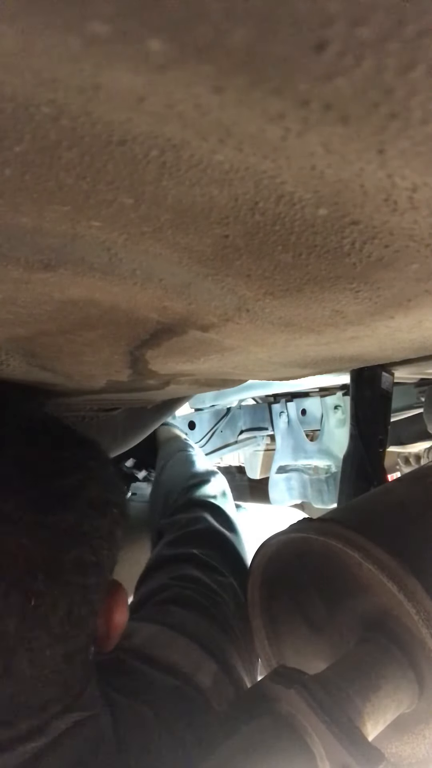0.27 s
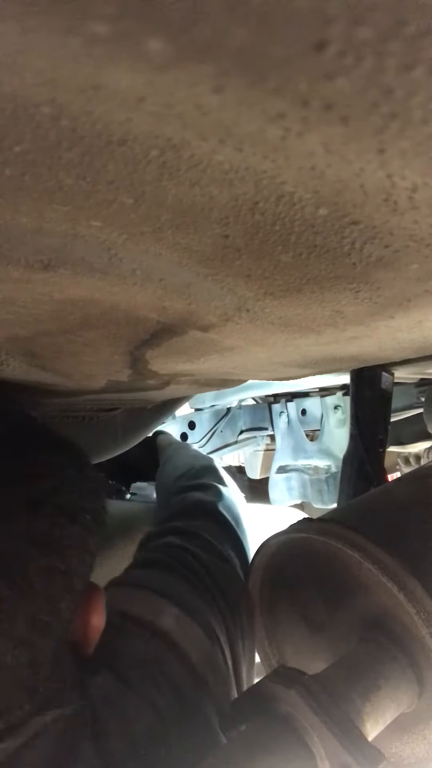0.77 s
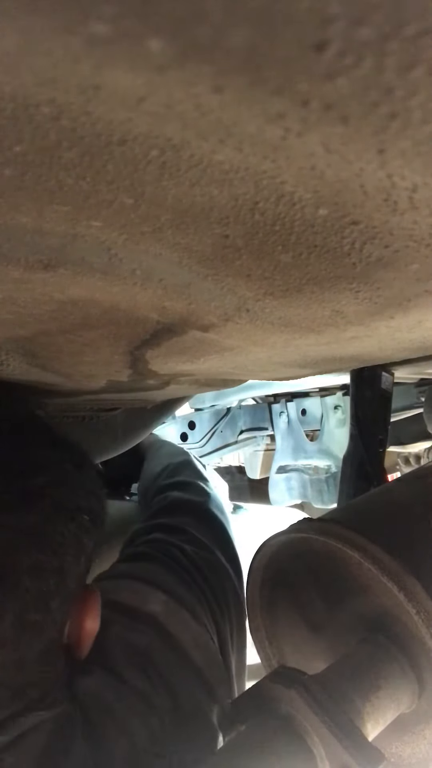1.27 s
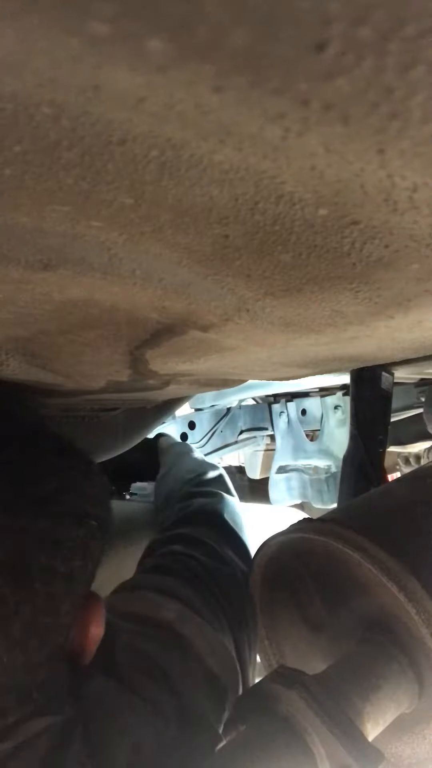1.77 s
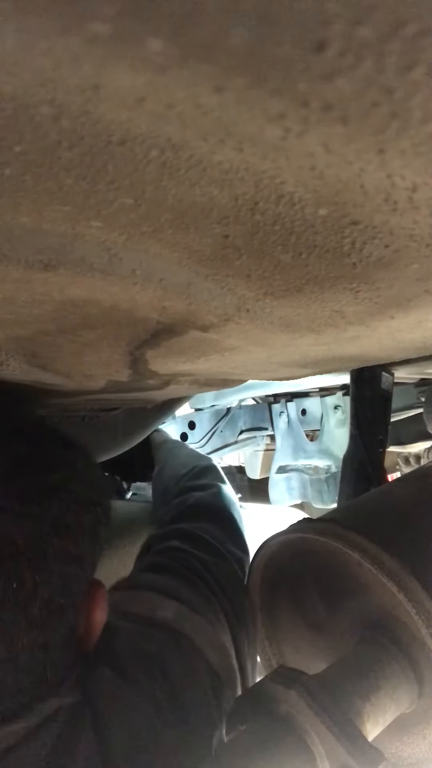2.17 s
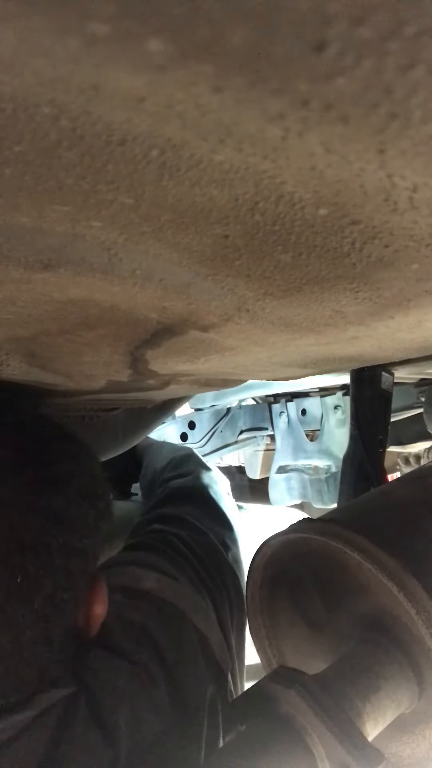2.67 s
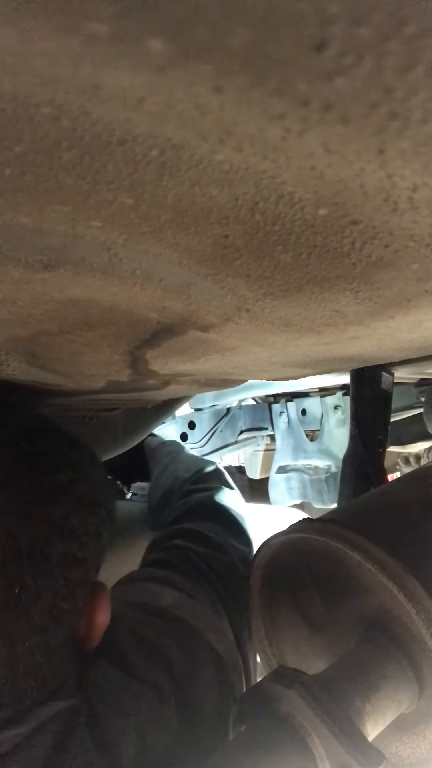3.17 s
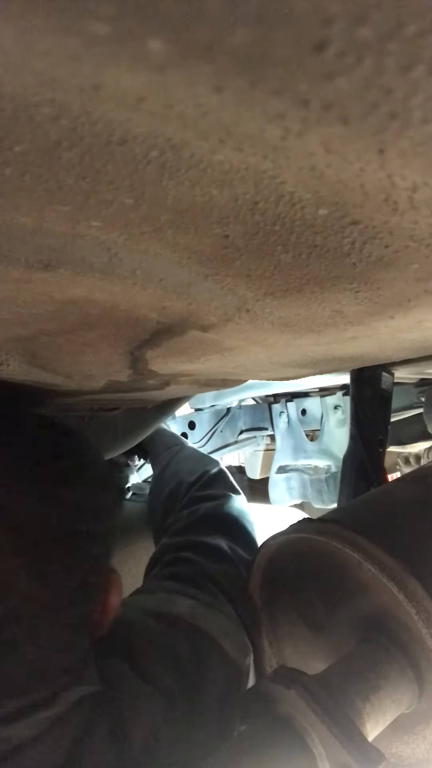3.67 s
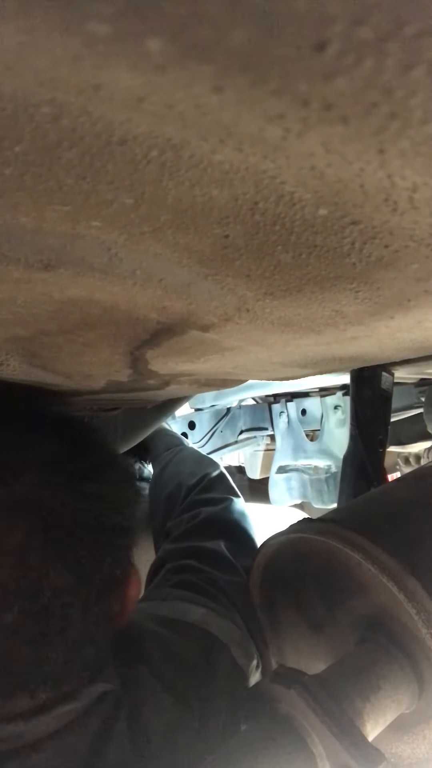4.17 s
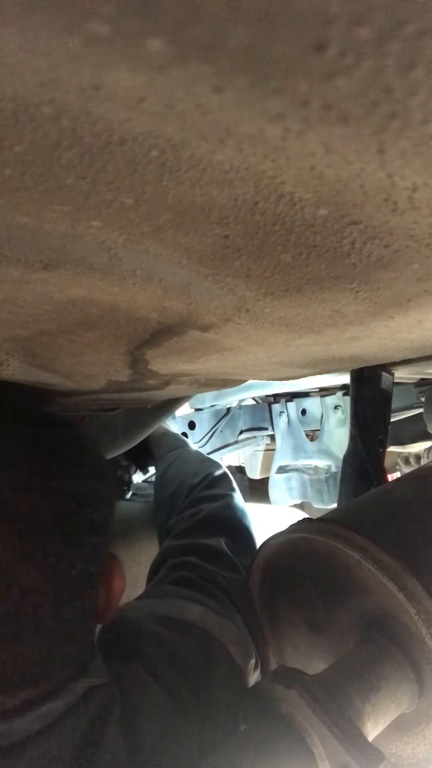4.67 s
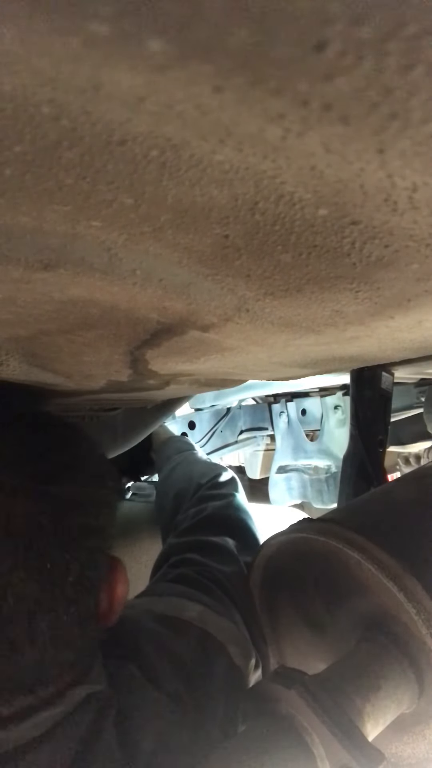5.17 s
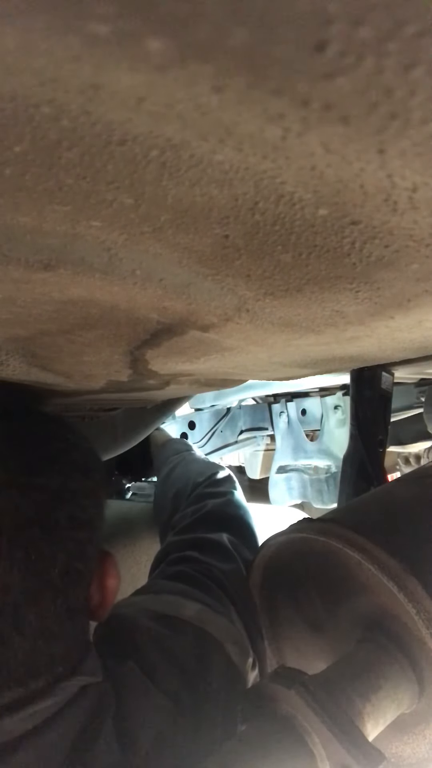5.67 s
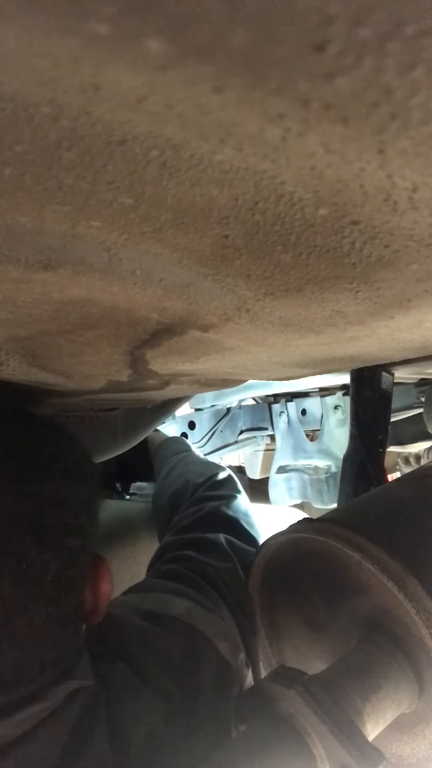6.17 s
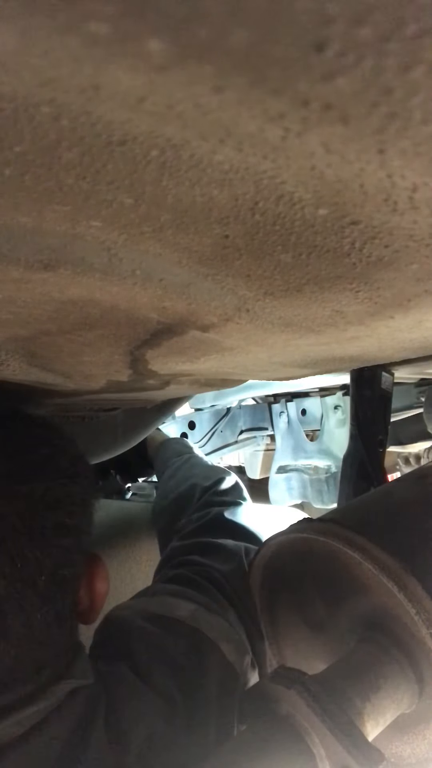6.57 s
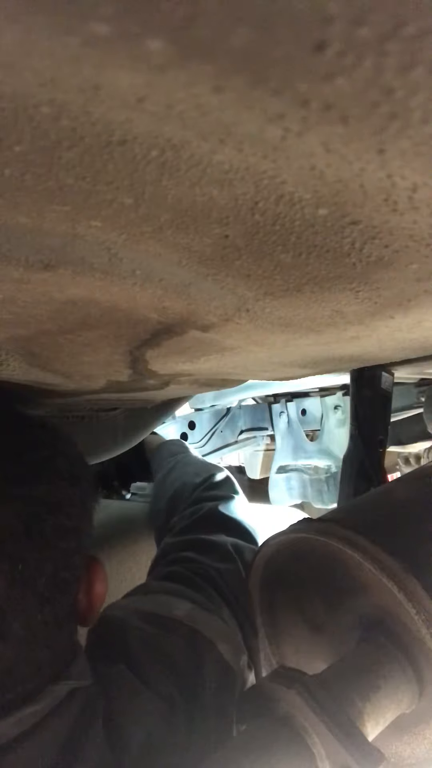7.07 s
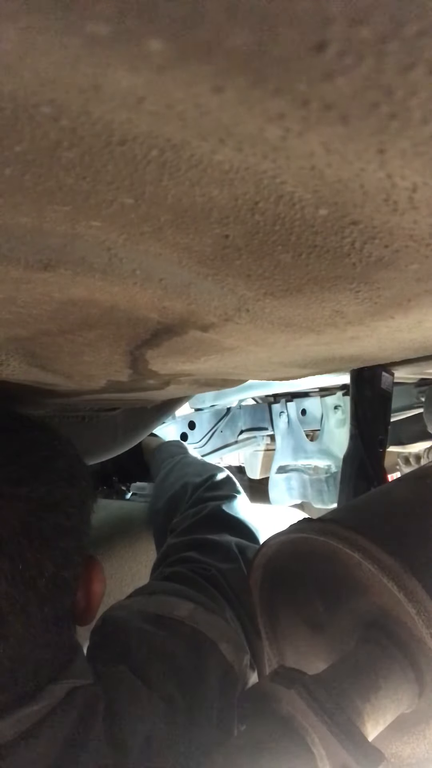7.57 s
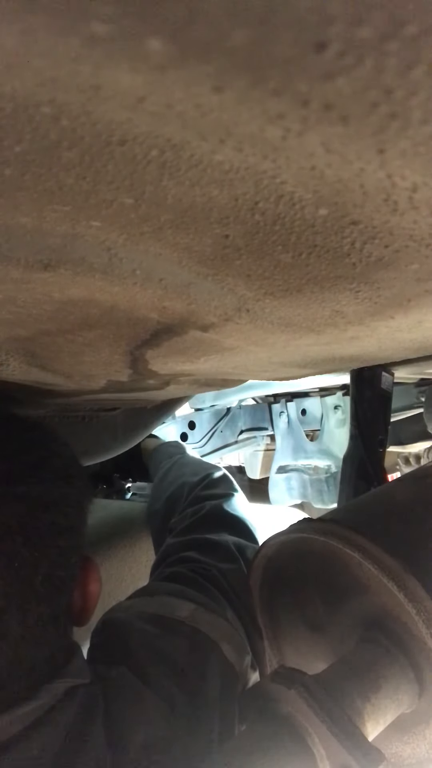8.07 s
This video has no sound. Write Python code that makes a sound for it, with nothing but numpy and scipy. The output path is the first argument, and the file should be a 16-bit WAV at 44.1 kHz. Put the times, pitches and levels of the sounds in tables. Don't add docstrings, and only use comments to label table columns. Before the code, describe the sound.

Low pulsing machine hum, faint cloth swishes, a light metal tap and a harder rattling clank, then a loud rushing air jet to the end.

```python
import sys
import numpy as np
from scipy import signal
from scipy.fft import rfft, irfft
from scipy.io import wavfile
from scipy.ndimage import uniform_filter1d

SR = 44100
rng = np.random.default_rng(int(sys.argv[2]) if len(sys.argv) > 2 else 0)


def int16_out(signal):
    q = np.round(np.clip(np.atleast_2d(signal).T, -1, 1) * 32767)
    wavfile.write(sys.argv[1], SR, q.astype(np.int16))


def magnitude_from_level(level_db):
    exponent = np.asarray(level_db, float) / 20
    return 10 ** exponent


N = 367794


def evened(x):
    return x / np.sqrt(np.mean(x ** 2) + 1e-20)


def read(points, hz):
    f, value = np.transpose(points)
    return np.interp(np.log(hz + 1), np.log(f + 1), value)


def columns(rows, t):
    s, *values = np.transpose(rows)
    return [np.interp(t, s, v) for v in values]


def hump(hz, centre_hz, octaves):
    return np.exp(-(np.log2((hz + 1) / centre_hz) / octaves) ** 2)


def drift(size):
    return evened(uniform_filter1d(uniform_filter1d(rng.standard_normal(N), size=size), size=size))


def resonate(x, hz, width_hz):
    turn = np.exp(2j * np.pi * np.cumsum(hz * np.ones(len(x))) / SR)
    r = np.exp(-np.pi * width_hz / SR)
    return 2 * (turn * signal.lfilter([1 - r], [1, -r], x / turn)).real


def ringing(hz, width_hz):
    return evened(resonate(resonate(rng.standard_normal(N), hz, width_hz), hz, width_hz))


def noise(colour, size, patchy_db, flicker_db, lift=lambda hz, t: 0):
    hop = size // 4
    hz = np.fft.rfftfreq(size, 1 / SR)[:, None]
    t = np.arange(N // hop + 5) * hop / SR
    a, b, patches = rng.standard_normal((len(t), len(hz), 3)).T
    patches = uniform_filter1d(patches, size=5, axis=0)
    patches = evened(uniform_filter1d(patches, size=12, axis=1))
    flicker = evened(uniform_filter1d(rng.standard_normal(len(t)), size=3))
    z = (a + 1j * b) * magnitude_from_level(read(colour, hz) + patchy_db * patches + flicker_db * flicker)
    both = np.array([z, z * magnitude_from_level(lift(hz, t))])
    plain, lifted = signal.istft(both, nperseg=size, noverlap=size - hop)[1][:, :N]
    return lifted / np.std(plain)


def jet():
    # start_s, level_db (pressure), aim (0-1, into small hollow), near_db (large hollow)
    trigger = [(6.47, -49, .8, 0), (6.52, -40.5, .5, -.5), (6.62, -38.5, .2, -.5), (6.74, -39.7, .15, -1),
               (6.86, -38.5, .15, 1), (7, -37.8, .2, .5), (7.13, -37, .1, 2), (7.24, -35.8, .1, -.5),
               (7.345, -34.4, .27, 1), (7.405, -32, .78, .5), (7.52, -30.5, .9, -1), (7.6, -30.2, .92, 0),
               (7.76, -29.3, .65, 2.5), (7.86, -29, .45, -1), (7.97, -30.3, .3, 0), (8.08, -29.7, .2, 1),
               (8.2, -30, .3, -1), (8.34, -29.7, .35, -1.5)]
    # pitch_hz, level_db (per Hz)
    nozzle = [(410, -52), (700, -29), (956, -5.5), (1310, -1), (1930, -1), (2220, 1), (2960, -4.5),
              (3700, -5.5), (6700, 0), (7730, -2.5), (8920, -0.5), (9770, -2), (10600, -11), (11400, -9),
              (14200, -15.5), (15600, -16)]
    # centre_hz, width_octaves, level_db, aimed_db (more when aimed), per_db (dB per dB of pressure)
    ridges = [(2200, .2, -2, 5.5, -.05), (3500, .13, 2.5, -3, .4), (4500, .06, .8, 0, -.15),
              (4950, .04, -.6, 0, .3), (1500, .3, -1.2, 1.2, -.1), (800, .25, 1.5, 0, -.2)]
    # pitch_hz, width_hz, level_db
    squeals = [(4150, 400, -50), (15500, 900, -51)]
    full_db = -30
    sway_db = .45
    t = np.arange(N) / SR
    low_sway, high_sway = drift(size=1500), drift(size=1500)

    def hollows(hz, s):
        level_db, aim, near_db = columns(trigger, s)
        push_db = (level_db - full_db).clip(-10)
        low_db = -0.6 + near_db - .35 * push_db + sway_db * np.interp(s, t, low_sway)
        high_db = -3 + 8 * aim + sway_db * np.interp(s, t, high_sway)
        top = np.clip(np.log2((hz + 1) / 10000) / .15, 0, 1)
        lift_db = low_db * hump(hz, 1720, 0.7) + high_db * hump(hz, 9300, 0.23) + (-1 + 6 * aim) * top
        for centre_hz, octaves, db, aimed_db, per_db in ridges:
            lift_db = lift_db + (db + aimed_db * aim + per_db * push_db) * hump(hz, centre_hz, octaves)
        return lift_db

    level_db, aim, _ = columns(trigger, t)
    hiss = magnitude_from_level(level_db + 4.0) * noise(nozzle, size=512, patchy_db=1.45, flicker_db=0.5, lift=hollows)
    buffet_db = -41 + 2.2 * (level_db - full_db) + 8 * aim + 2 * drift(size=700)
    rumble = resonate(resonate(rng.standard_normal(N), 297.5, 620), 280, 620)
    buffet = magnitude_from_level(buffet_db) * evened(rumble)
    since = np.maximum(t - trigger[0][0], 0)
    squeal = sum(magnitude_from_level(db) * ringing(hz, width) for hz, width, db in squeals)
    squeal = squeal * magnitude_from_level(-60 * since / .45)
    opening = np.minimum(since / .023, 1) ** 2
    return (hiss + buffet + squeal) * opening


def knocks(blows, part):
    # pitch_hz, level_db (per Hz)
    loose = [(150, -44), (400, -1), (1200, 2), (2500, -6), (4000, -15), (7000, -17), (8800, -33),
             (15500, -58)]
    detune, spot_db = .018, 2.5
    rattle_share = .47
    out = np.zeros(N)
    u = np.arange(SR // 4) / SR
    hz_axis = np.fft.rfftfreq(len(u), 1 / SR)
    dull = 1 / (1 + (hz_axis / 3000) ** 4)
    rise = np.sin(np.pi / 2 * np.minimum(u / 0.0021, 1)) ** 2
    chances = rng.random((len(blows), len(part), 3))
    for (s, db, hard_db, weight_db, last), chance in zip(blows, chances):
        tilt_db = lambda hz: hard_db * np.log2(np.maximum(hz / 1000, 1)) + weight_db * (hz < 900)
        ring = np.zeros(len(u))
        for k, ((hz, mode_db, t60), (p, q, d)) in enumerate(zip(part, chance)):
            fade_db = mode_db + spot_db * (2 * q - 1) + tilt_db(hz) - 60 * u / (t60 * last)
            shifted_hz = hz * (1 + detune * (2 * d - 1))
            ring += magnitude_from_level(fade_db) * np.sin(2 * np.pi * (shifted_hz * u + k / 2 + 0.25 * p))
        z = rfft(rng.standard_normal(len(u))) * magnitude_from_level(read(loose, hz_axis) + tilt_db(hz_axis))
        low, high = irfft(z * np.array([dull, 1 - dull]), len(u)) / np.std(irfft(z, len(u)))
        rattle = 1.46 * (low * magnitude_from_level(-60 * u / (0.14 * last)) + high * magnitude_from_level(-60 * u / (0.067 * last)))
        blow = magnitude_from_level(db - 7.0) * ((1 - rattle_share) * ring + rattle_share * rattle) * rise
        out[round(s * SR):][:len(u)] += blow
    return out


def sleeve():
    # pitch_hz, level_db (per Hz)
    cloth = [(530, -41), (900, -7), (990, -0.6), (1580, -1.2), (1840, 1.2), (2000, -3.5), (2800, -10.3),
             (3470, -28), (3860, -18.5), (4200, -22), (6520, -18.5), (7990, -22.5), (10500, -30.5),
             (12600, -28), (15600, -34.5)]
    # pitch_hz, width_hz, level_db
    weave = [(3960, 65, -6), (4700, 34, -4), (5220, 150, -9), (6140, 230, -7), (6700, 71, -3),
             (7550, 42, -4), (9000, 100, -8), (9500, 46, -11), (12600, 110, -12)]
    # peak_s (greatest speed), level_db, rise_s (over 10 dB), fall_s (over 10 dB)
    strokes = [(0.07, -68.5, .1, .3), (.36, -66, .08, .1), (0.44, -58.5, .12, .22), (0.53, -57, .04, .08),
               (0.57, -57, .06, .09), (0.67, -59.5, .07, .07), (0.73, -58.5, .035, .08),
               (0.76, -54, .06, .1), (0.83, -61, .08, .08), (0.95, -65, .1, .07), (1.485, -62, .06, .06),
               (1.72, -69, .15, .15), (1.95, -69, .15, .15), (2.28, -60.5, .1, .12), (2.9, -70, .15, .15),
               (3.09, -71, .08, .06), (3.39, -68, .07, .06), (3.66, -62, .1, .1), (3.73, -59.5, .07, .1),
               (4.7, -69, .1, .4)]
    # start_s, peak_db
    ticks = [(0.3194, -62), (0.538, -60), (.557, -60), (.573, -61), (.755, -54), (.763, -57), (.788, -59),
             (.942, -63), (.956, -61), (1.490, -59), (1.506, -61), (1.620, -62), (2.260, -58),
             (2.2964, -62), (2.660, -62), (2.772, -64), (3.167, -66), (3.3714, -63), (3.49, -65),
             (3.516, -62), (3.6227, -55), (3.6625, -52), (3.6814, -58), (3.726, -58), (3.8364, -64),
             (3.9485, -59), (4.6194, -68)]
    t = np.arange(N) / SR
    duller = lambda hz, s: -1.5 * np.clip(np.log2((hz + 1) / 8000), 0, 1)
    rub = noise(cloth, size=512, patchy_db=1.3, flicker_db=.7, lift=duller)
    rub = rub + 1.8 * sum(magnitude_from_level(db / 2) * resonate(rub, hz, width) for hz, width, db in weave)
    at = t[::64]
    power = np.zeros(len(at))
    for s, db, rise, fall in strokes:
        power += magnitude_from_level(db - 10 * np.maximum((s - at) / rise, (at - s) / fall)) ** 2
    speed = np.interp(t, at, np.sqrt(power))
    out = magnitude_from_level(11.0 + 1.2 * drift(size=900)) * speed * rub
    u = np.arange(300) / SR
    for (s, db), fibre in zip(ticks, rng.standard_normal((len(ticks), len(u)))):
        out[round(s * SR):][:len(u)] += magnitude_from_level(db - 3.0 - 60 * u / .006) * np.diff(fibre, prepend=0)
    return out


def cavity(x):
    # delay_s, level_db
    echoes = [(.0013, -26.5), (.0029, -20), (.0044, -20), (.0067, -15.5), (.0094, -17.5), (.0131, -25),
              (.0178, -16.5)]
    taps = np.zeros(SR // 40)
    taps[0] = 1
    for k, (s, db) in enumerate(echoes):
        taps[round(s * SR)] = (-1) ** k * magnitude_from_level(db - 2.5)
    return signal.oaconvolve(x, taps / np.linalg.norm(taps))[:N]


def fan():
    # start_s, level_db (of the swell that follows), share (second fan, 0-1)
    beats = [(-.05, -37, .95), (.47, -37, .35), (1.37, -42, .95), (1.98, -42, .8), (2.55, -37, .8),
             (3.35, -38.5, .3), (4.55, -42, .9), (4.9, -36, .7), (5.78, -45, .95), (6.18, -36, .6),
             (7.18, -49, .95), (7.7, -39, .95), (8.2, -45, .8), (8.5, -45, .8)]
    # peak_s, level_db
    swells = [(.2, -49), (.55, -52), (1.05, -49), (1.25, -50), (1.7, -47), (2.5, -46), (3.05, -48.5),
              (3.35, -48.5), (3.7, -53), (4.2, -54), (4.55, -53), (4.78, -49), (5.3, -50), (5.7, -52),
              (5.92, -48), (6.35, -52), (7.0, -51), (7.75, -48), (8.05, -48), (8.3, -49)]
    # multiple, level_db, width_hz
    overtones = [(1.001, -46, 14), (2.01, -63, 9), (3, -59.5, 6)]
    blade_hz = 169.25
    t = np.arange(N) / SR
    s, swell_db, share = np.transpose(beats)
    level_db = uniform_filter1d(swell_db[np.searchsorted(s, t) - 1], size=6000)
    share = np.interp(t, s, share)
    slip = np.pi * np.interp(t, s, np.arange(len(s)))
    turn = 2 * np.pi * blade_hz * t
    tone = magnitude_from_level(level_db + 1.2) * (np.sin(turn + slip) - share * np.sin(turn - slip))
    at = t[::256]
    swell = sum(magnitude_from_level(db) * np.exp(-((at - peak) / .15) ** 2) for peak, db in swells)
    octave = np.interp(t, at, swell) * np.sin(2.008 * turn + .6 * drift(size=4000))
    blur = sum(magnitude_from_level(db) * ringing(k * blade_hz, width) for k, db, width in overtones)
    return np.sqrt(2) * (tone + octave) + blur


def drone():
    # pitch_hz, level_db (per Hz)
    low_colour = [(15, -46), (25, -26.5), (60, -3.5), (92, -9.5), (170, -4.5), (195, -10), (267, -16),
                  (297, -19), (335, -15.5), (389, -21.5), (517, -20.5), (719, -37), (900, -27.5),
                  (1170, -61), (1980, -120)]
    # pitch_hz, level_db (per Hz)
    top_colour = [(350, -22.5), (600, 0.5), (788, -8.5), (903, -2.5), (1170, -3), (1690, -6), (2190, -11),
                  (2690, -17), (3880, -26), (4210, -26), (4890, -33.5), (6340, -29), (7550, -36),
                  (9600, -40), (10400, -46.5), (11200, -42.5), (13600, -40.5), (15600, -47)]
    # pitch_hz, width_hz, level_db
    room_modes = [(47.5, 8.2, -49), (74.2, 11, -45.5), (118.5, 14, -41), (141.4, 12, -40), (192, 20, -44.5),
                  (256.4, 16.4, -53), (4113, 28, -78), (4600, 200, -82), (13450, 350, -91)]
    low = magnitude_from_level(-35.5) * noise(low_colour, size=4096, patchy_db=0.53, flicker_db=0.83)
    top = magnitude_from_level(-47) * noise(top_colour, size=512, patchy_db=1.38, flicker_db=0.8)
    return low + top + sum(magnitude_from_level(db) * ringing(hz, width) for hz, width, db in room_modes)


def scene():
    # start_s, peak_db, hardness_db (per octave above 1 kHz),
    # weight_db (below 900 Hz), last (ring time factor)
    taps = [
        (2.6565, -25.5, -3.5, -4, 1),
        (2.6605, -27, -4.5, 3, 1),
        (2.6655, -33, -6, 9, 1),
        (2.674, -35, -6, 10, 1.1),
        (2.682, -39, -4, 8, 1),
    ]
    blows = [(3.934, -46, 5, -6, .9), (3.9395, -40, 6, -8, .8), (3.9438, -16, 3.5, -5, 0.7),
             (3.9495, -27, 5, 4, .8), (3.9545, -30, 4.5, 5, 0.85), (3.9600, -29, 0, 3, .7),
             (3.9640, -22, -1, 1, 0.6), (3.969, -33, 4, 3, .8), (3.9745, -28, 3.5, 3, .9),
             (3.981, -31, 1.5, 5, .9), (3.986, -33, 1, 2, .7), (3.993, -36, -3, 4, .8),
             (4.003, -35, -2, 5, .9)]
    # pitch_hz, level_db, t60_s
    bracket = [(390, -2, .09), (520, -4, .1), (720, -7, .08), (1061, -1, .07), (1285, 4, .06),
               (1500, -5, .04), (1850, 1, .035), (2300, 0, .025), (2950, -2, .02), (4080, -14, .04),
               (5700, -17, .02), (6450, -15, .035), (8010, -17, .025), (9450, -17, .035)]
    # pitch_hz, level_db, t60_s
    part = [(380, -2, .1), (415, 2.5, 0.11), (235, -2, .1), (660, -6, 0.088), (1048, 2, 0.09),
            (1290, 3, 0.09), (1170, 13, 0.05), (1450, -1, 0.055), (2230, -3.5, .05), (2600, -3, .045),
            (3770, -5, .055), (4400, -10, 0.04), (5750, -15, 0.045), (6500, -17, .035)]
    near = cavity(jet() + sleeve())
    struck = knocks(blows, part) + knocks(taps, bracket)
    return np.tile(near + struck + fan() + drone(), (2, 1))


def top_cut(x):
    return signal.sosfilt(signal.butter(12, 15860, fs=SR, output="sos"), x)


def record(dry):
    # start_s (centre), low_hz, high_hz
    unlike = [(1.82, 4800, 7600), (2.34, 6900, 11800), (2.41, 5600, 8300), (2.85, 6900, 11000),
              (4.66, 7600, 9000), (6.38, 5200, 7600), (6.80, 8300, 10400), (6.96, 13800, 15700),
              (8.31, 4100, 8300), (8.31, 14500, 15700)]
    size = 2048
    side = np.zeros(N)
    hz = np.fft.rfftfreq(size, 1 / SR)
    window = np.hanning(size)
    for s, low_hz, high_hz in unlike:
        at = min(round(s * SR) - size // 2, N - size)
        band = abs(rfft(dry[0, at:at + size] * window)) * (hz > low_hz) * (hz < high_hz)
        scrambled = band * np.exp(2j * np.pi * rng.random(len(hz)))
        side[at:at + size] += irfft(scrambled) * window * 1.506
    stereo = dry + side * np.array([[1], [-1]])
    over_hz = np.clip(np.fft.rfftfreq(N, 1 / SR) - 15725, 0, 200)
    mix = irfft(rfft(stereo) * magnitude_from_level(-.68 * over_hz), N)
    return top_cut(mix)


dry = scene()
out = record(dry)
int16_out(out)
```